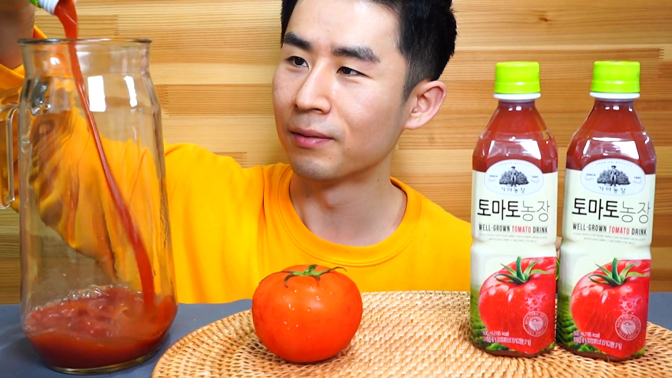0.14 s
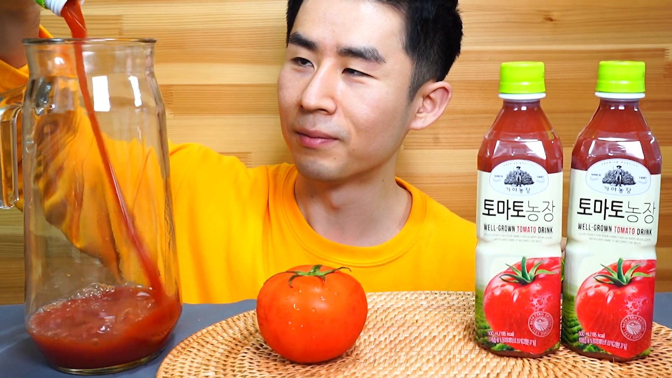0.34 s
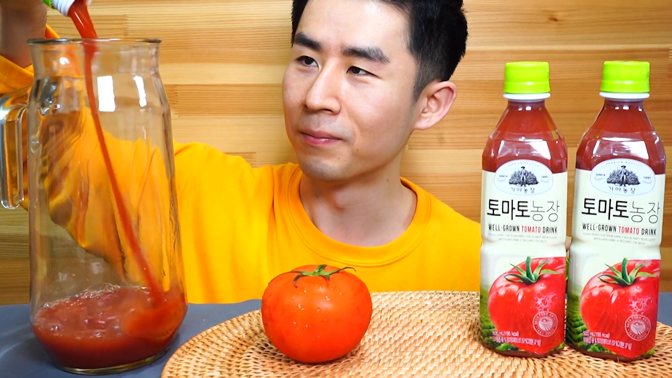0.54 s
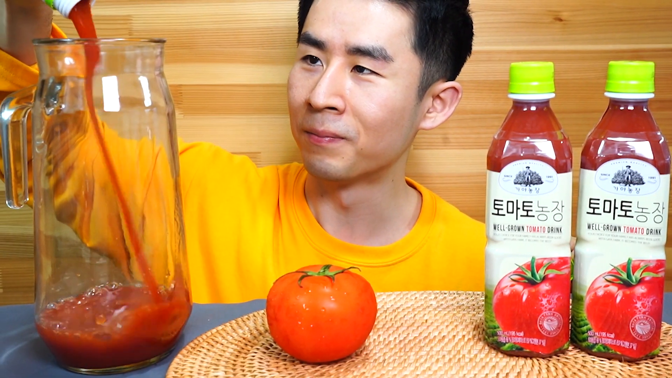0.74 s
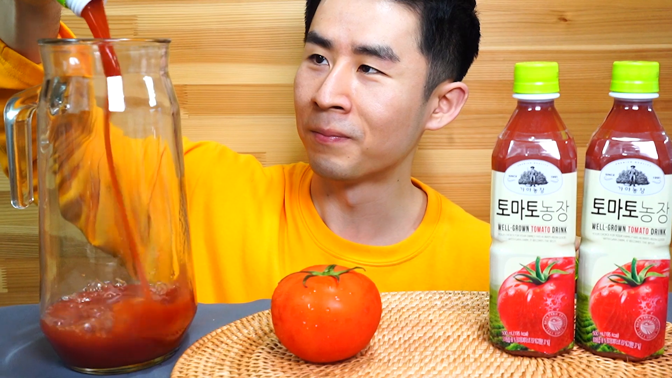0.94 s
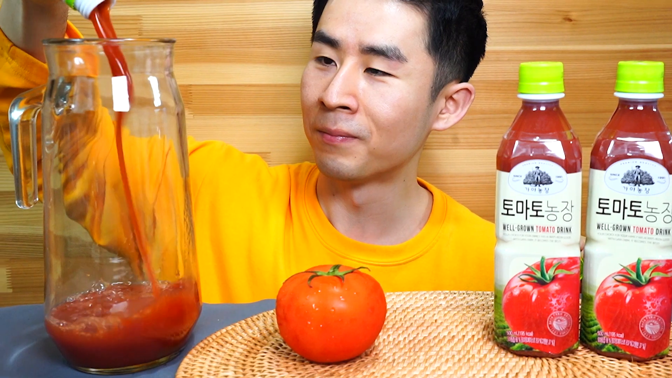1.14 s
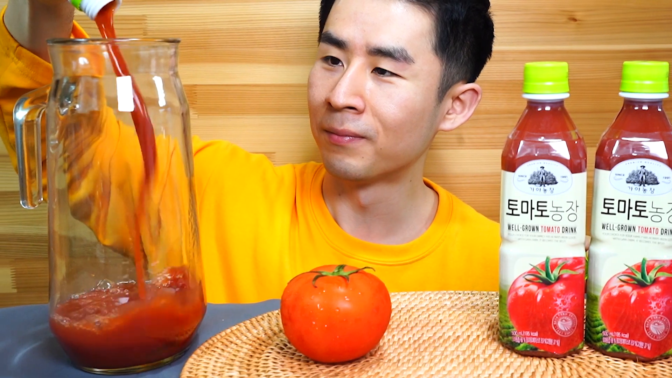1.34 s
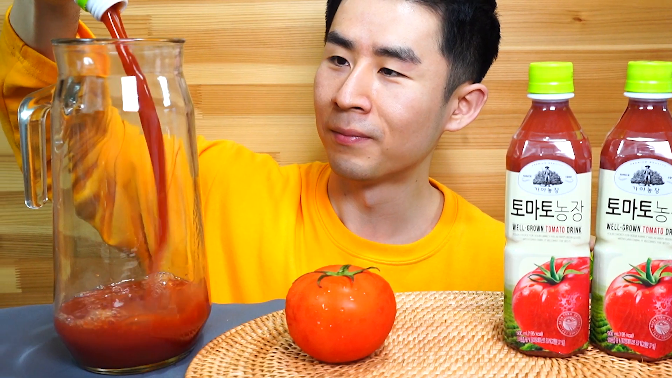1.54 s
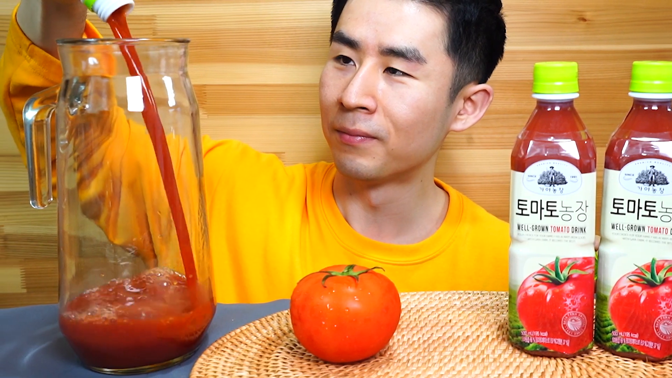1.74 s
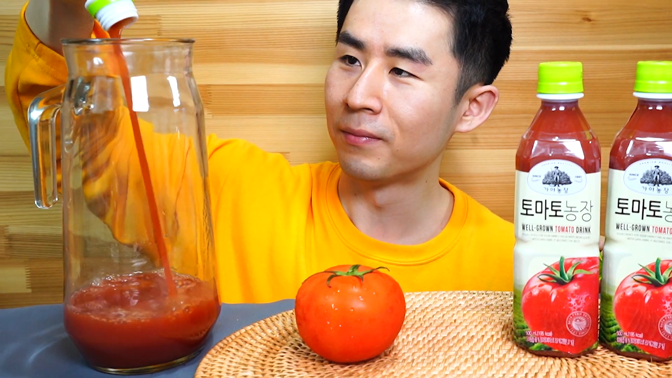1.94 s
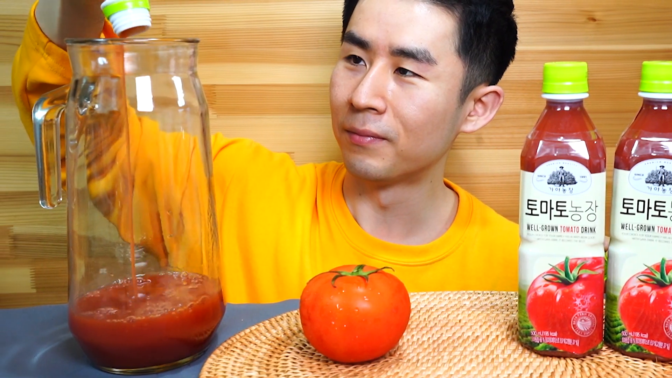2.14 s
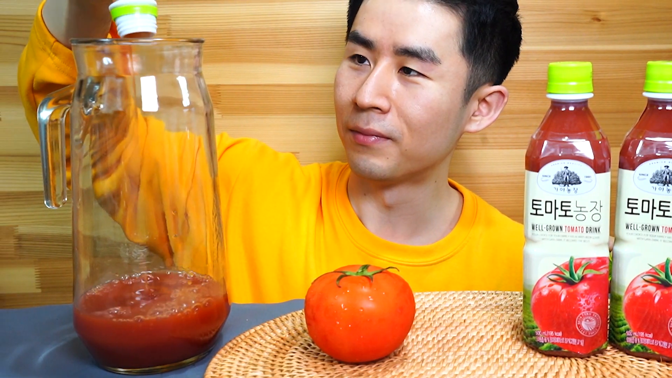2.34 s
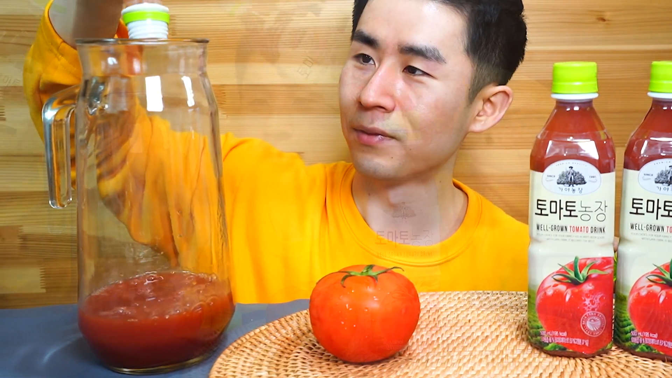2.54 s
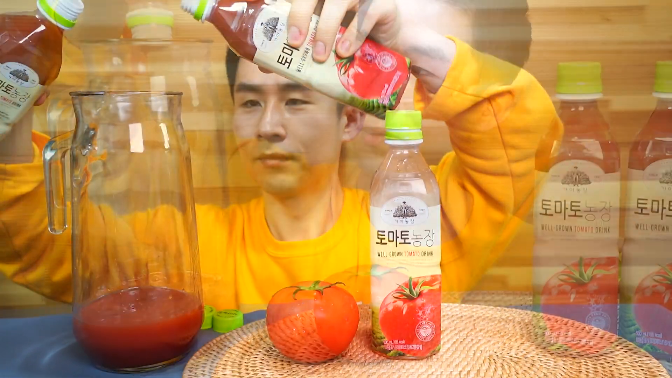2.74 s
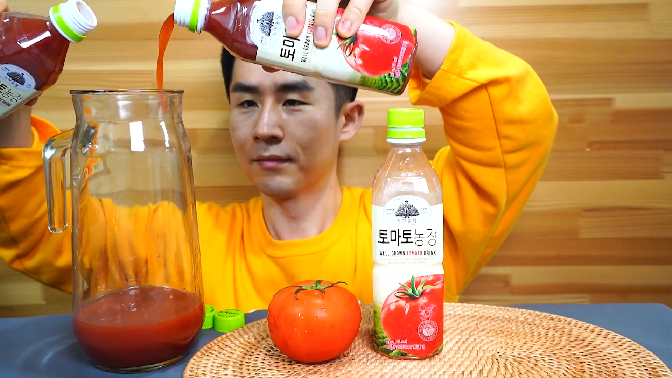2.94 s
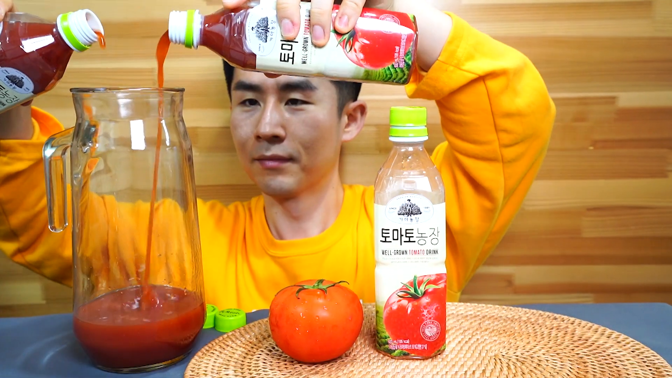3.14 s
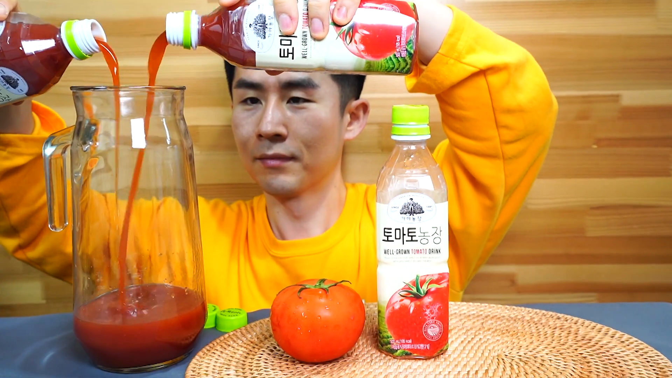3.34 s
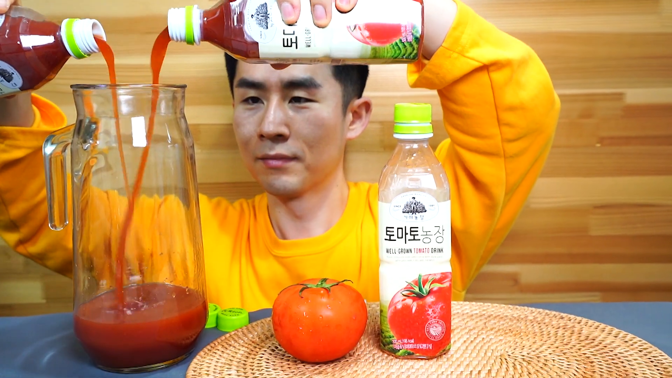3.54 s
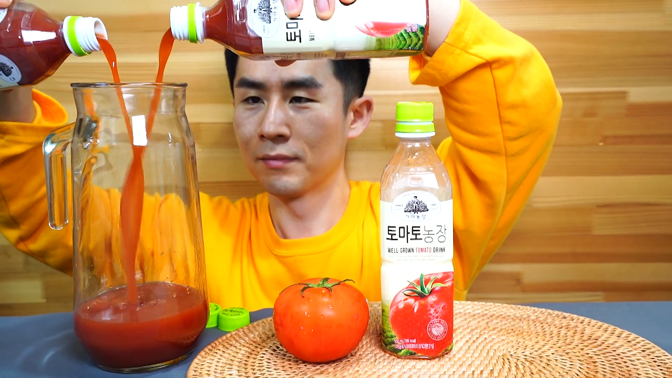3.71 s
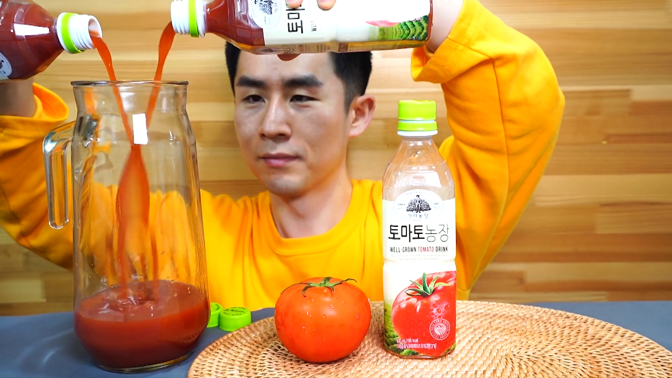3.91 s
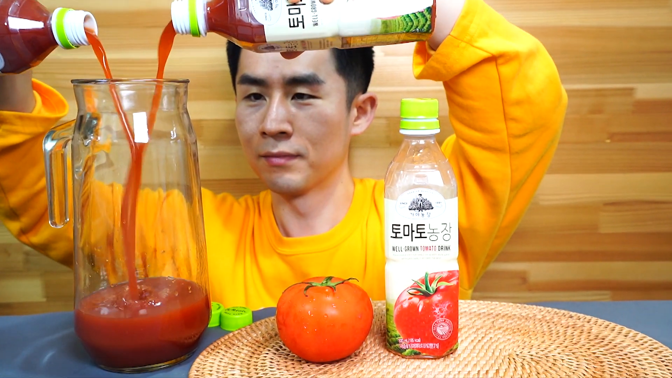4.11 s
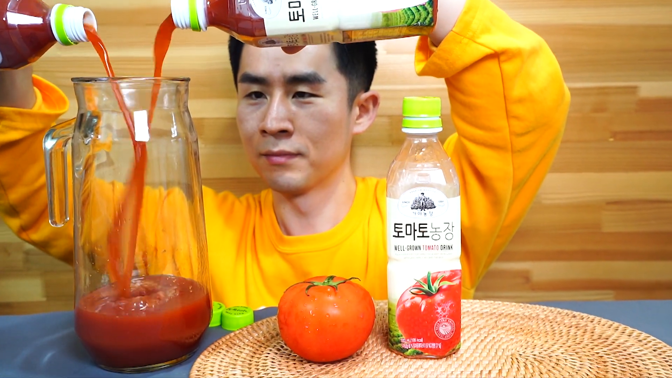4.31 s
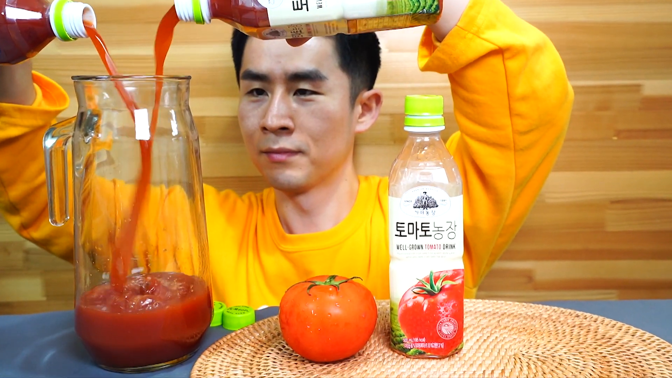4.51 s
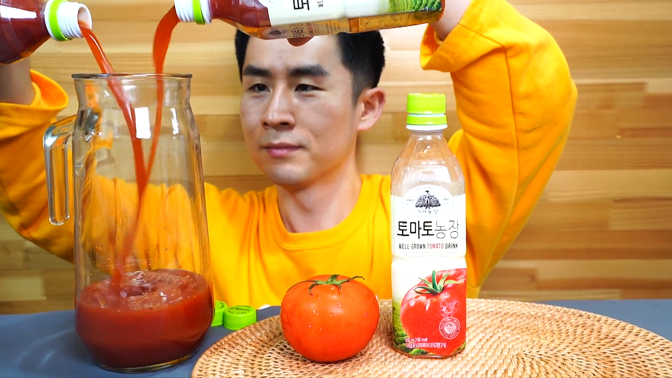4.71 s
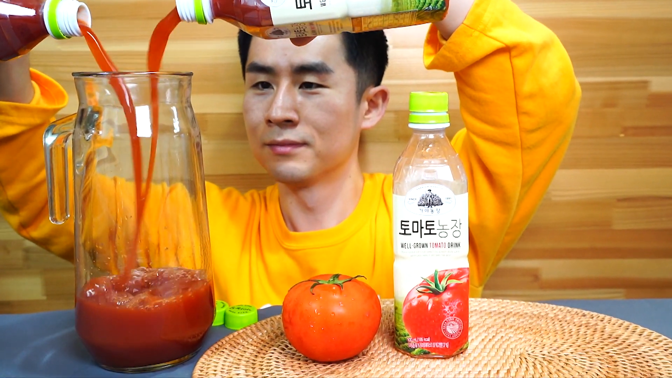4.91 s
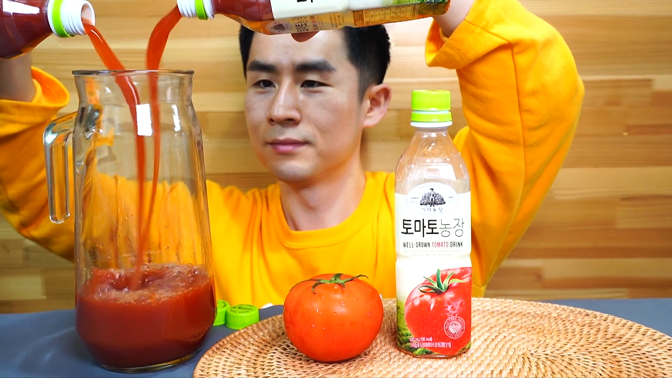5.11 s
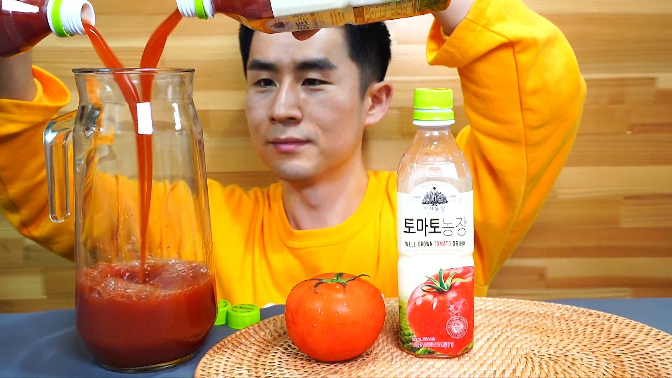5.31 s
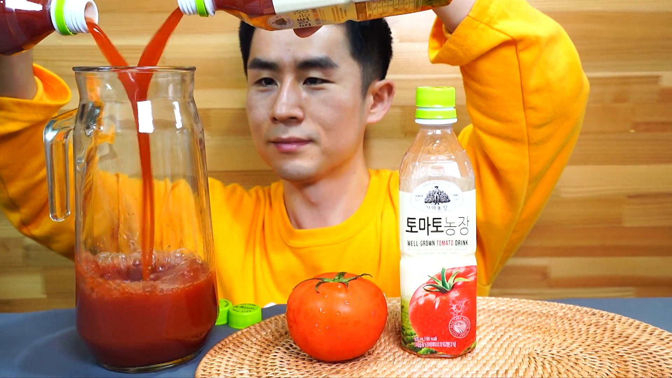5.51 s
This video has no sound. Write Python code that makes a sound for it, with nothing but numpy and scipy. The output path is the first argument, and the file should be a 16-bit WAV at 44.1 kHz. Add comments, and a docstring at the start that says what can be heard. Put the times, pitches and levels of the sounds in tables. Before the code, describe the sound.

Thick juice is poured close to the microphones into a tall glass pitcher, slightly left of centre, in a small quiet room. From 0 to about 2 s one stream churns unevenly: hollow low plops, glugs that sweep quickly upward, mid-pitched bloops, fine fizz and bright spatter ringing between the glass walls. A very strong gulp lands near 1.15 s, with more glugs and splashes around 1.5 to 1.9 s. The stream then thins to a dribble, with a small bloop at 2.4 s. In the near-quiet pause, soft dull knocks of handling come at about 2.7 and 2.85 s. Pouring returns at 3.3 s, and two streams soon run together; from 4.2 s plops crowd closer, heavy and wet, with steadier churning and fizz. The hollow air tone is mostly higher as the pitcher fills. The sound ends mid-pour at about 5.5 s, over faint room tone.

```python
"""Thick juice is poured from plastic bottles into a tall glass pitcher in a small room.
First one stream churns, glugs and fizzes; it thins out to a dribble.
In the pause come soft knocks of handling, then two streams pour together until the end.
Air trapped by the juice rings as plops, glugs and bubbles; bursts of spatter ring between the glass walls.
The ringing of the air above the juice mostly climbs in pitch as the pitcher fills."""
import sys
import numpy as np
from scipy import signal
from scipy.fft import rfft, irfft, next_fast_len
from scipy.io import wavfile

SR = 44100
rng = np.random.default_rng(int(sys.argv[2]) if len(sys.argv) > 2 else 0)


def store_pcm(level_fs):
    """Save levels as 16-bit WAV."""
    pcm = np.round(np.clip(level_fs, -1, 1) * 32767).astype(np.int16)
    wavfile.write(sys.argv[1], SR, np.atleast_2d(pcm).T)


N = 245195
TIME = np.arange(N) / SR   # seconds
CUTOFF_HZ = 15950   # top of the treble


def from_db(db):
    """Turn decibels into a gain."""
    return 10 ** (np.asarray(db) / 20)


def rms_one(x):
    """Scale a sound to an average (rms) strength of one."""
    return x / np.sqrt(np.mean(x ** 2) + 1e-20)


def in_time(rows):
    """Read each column of a table at every sample; the first column is time in seconds."""
    s, *columns = np.transpose(rows)
    return [np.interp(TIME, s, column) for column in columns]


def at_hz(points, hz):
    """Read a curve over pitch, with straight lines on a log-frequency axis."""
    f, value = np.transpose(points)
    return np.interp(np.log(np.maximum(hz, 1)), np.log(f), value)


def add(track, s, sound):
    """Mix a sound into the track at a given second."""
    start = max(0, round(s * SR))
    track[start:start + len(sound)] += sound[:max(0, N - start)]


def colour(x, spectrum, size=8192):
    """Filter a sound to a given spectrum, with nothing sounding ahead of time (minimum phase)."""
    gains = from_db(at_hz(spectrum, np.fft.rfftfreq(size, 1 / SR)))
    cepstrum = irfft(np.log(gains))
    # folding the second half onto the first makes the filter causal
    cepstrum[1:size // 2] *= 2
    cepstrum[size // 2 + 1:] = 0
    response = irfft(np.exp(rfft(cepstrum)))
    return signal.fftconvolve(x, response)[:len(x)]


def drift(rate):
    """Slow random wandering with a spread of about one, turning up to `rate` times a second."""
    knots = rng.standard_normal(int(rate * N / SR) + 2)
    return rms_one(np.interp(TIME * rate, np.arange(len(knots)), knots))


def tremble(t, rate):
    """Random unsteadiness over the life of one short sound, with a spread near one."""
    knots = rng.standard_normal(256)
    return np.interp(t * rate, np.arange(len(knots)), knots)


def resonance(x, hz, width_hz):
    """A ringing filter with a gain of one at its centre, which may move."""
    turn = np.exp(2j * np.pi * np.cumsum(hz * np.ones(len(x))) / SR)
    r = np.exp(-np.pi * width_hz / SR)
    # shift the centre down to zero, smooth, and shift back up
    smooth = signal.lfilter([1 - r], [1, -r], x / turn + 1e-18)
    return 2 * np.real(turn * smooth)


def swell_and_die(t, t60, swell_s):
    """Loudness of a bubble: a quick swell, then a fall of 60 dB every t60 seconds."""
    return (1 - np.exp(-(t / swell_s) ** 2)) * from_db(-60 * t / t60)


def bubble(t, hz, t60, rise, swell_s):
    """Air pulsing in juice: a dying sine whose envelope peaks at one, rising by `rise` octaves a second."""
    t = np.maximum(t, 0)
    envelope = swell_and_die(t, t60, swell_s)
    cycles = hz * t * (1 + rise * np.log(2) * t / 2)
    return np.sin(2 * np.pi * cycles) * envelope / (envelope.max(axis=-1, keepdims=True) + 1e-12)


def impacts(per_s, spread_db):
    """Random clicks of uneven size, as many small blows of juice would give."""
    sizes = from_db(spread_db * np.minimum(rng.exponential(1, N), 4)) * rng.choice([-1, 1], N)
    return sizes * (rng.random(N) < per_s / SR)


def tail(t60, gap_s):
    """Random echoes of unit energy that begin after a short gap and die away."""
    t = TIME[:SR * 3 // 4]
    echoes = rng.standard_normal(len(t)) * from_db(-60 * t / t60) * (t > gap_s)
    return echoes / np.sqrt(np.sum(echoes ** 2))


# colour of the quiet room: pitch_hz, level_db
QUIET_ROOM_COLOUR = [(15, -55), (25, -1), (127, 6.5), (394, -5), (463, -2.5), (624, -6), (818, -7),
                     (2350, -12), (3520, -14.5), (5140, -15), (6210, -18), (10100, -19.5), (12900, -21),
                     (16000, -23)]


def room_tone(level_db=-55, apart=0.87):
    """Faint steady rumble and hiss: coloured noise, partly different on the left and the right."""
    mid, side = [rms_one(colour(rng.standard_normal(N), QUIET_ROOM_COLOUR)) for part in range(2)]
    return from_db(level_db) * (mid + apart * side * np.array([[1], [-1]]))


# how strongly each stream runs, before surges and mixing: start_s, churn_db (deep), gurgle_db, fizz_db
FIRST_POUR = [(0.0, -52.5, -58, -35), (0.37, -47.5, -49, -39), (1.04, -51.5, -42.5, -39),
              (1.14, -40, -45.5, -41.5), (1.63, -54, -38.5, -35), (1.79, -47, -43.5, -40.5),
              (1.98, -55.5, -52.5, -58.5), (2.15, -57, -60.5, -53.5), (2.3, -62, -73, -75)]
DRIBBLE = [(2.4, -48, -45, -66), (2.558, -60.5, -58, -60), (2.68, -60, -47.5, -55.5)]
DOUBLE_POUR = [(3.33, -49, -57, -42), (3.45, -51.5, -46, -60), (3.58, -49, -50, -51.5),
               (4.03, -46, -50, -48), (4.2, -39.5, -44.5, -48.5), (4.76, -42.5, -45, -39.5),
               (5.09, -37.5, -44, -38.5), (5.2, -38, -44.5, -41.5), (5.56, -43, -48.5, -39)]
# gouts let go by the bottles, levels before mixing (t60: seconds to fall by 60 dB):
# start_s, plop_db, plop_t60_s, thud_db, glug_db, glug_pitch_hz
GOUTS = [(0.035, -49, .13, -50, -44, 495), (0.223, -25, 0.16, -37, -36, 386),
         (0.398, -32, 0.21, -44, -29.5, 654), (0.578, -26.5, 0.31, -41, -41.5, 464),
         (0.766, -29, 0.26, -39, -38, 478), (0.957, -24.5, 0.33, -42, -24, 431),
         (1.149, -8, .22, -21, -13, 364.5), (1.318, -21.5, 0.24, -45, -29, 375),
         (1.526, -30, 0.22, -23.5, -43, 482), (1.67, -13.5, 0.29, -22.5, -16, 384.6),
         (1.82, -17, 0.16, -37, -42, 360), (1.891, -21.5, 0.18, -53, -30.5, 356),
         (2.46, -56, .2, -50, -42, 773), (2.555, -58, .2, -58, -48.5, 872),
         (3.273, -27, 0.45, -21, -22, 513), (3.562, -32, .08, -48, -36.5, 613),
         (3.59, -41, 0.13, -33, -32.5, 502.5), (3.752, -30, .1, -43, -36, 482),
         (3.806, -26.5, 0.15, -42, -41, 484), (3.993, -26, 0.29, -21.5, -20.5, 522.5),
         (4.174, -5, 0.13, -20, -19, 434), (4.258, -27, 0.43, -44, -35, 427),
         (4.399, -26, 0.13, -21.5, -24, 467), (4.521, -20, 0.12, -43, -29, 416),
         (4.615, -8.5, 0.11, -17, -48, 410), (4.678, -18, .1, -39, -35, 435),
         (4.733, -17.5, 0.11, -29, -36, 424), (4.809, -18, 0.16, -21.5, -44, 431),
         (4.899, -19, 0.044, -52, -43, 428), (4.997, -15.5, 0.031, -24.5, -32, 442),
         (5.097, -14, 0.22, -31, -29, 394), (5.135, -16.5, 0.31, -33, -39, 436),
         (5.286, -8, 0.16, -16.5, -44, 440), (5.378, -16, 0.045, -51, -29, 439),
         (5.422, -18, .065, -40, -42, 450), (5.49, -6.5, 0.12, -18, -35, 434)]
# swelling of the stream around each gout: churn_db, gurgle_db, fizz_db
SURGE = (9.5, 5, 6)
START_DB_PER_S, STOP_DB_PER_S = 596, 305   # how fast a stream sets in and dies away
SURGE_LAG_S, SURGE_WIDTH_S = .02, .018


def flow():
    """Strength of the pour in dB: each stream sets in, runs, surges around every gout and dies away."""
    levels = []
    for pour in (FIRST_POUR, DRIBBLE, DOUBLE_POUR):
        early = np.maximum(pour[0][0] - TIME, 0)
        late = np.maximum(TIME - pour[-1][0], 0)
        levels.append(np.array(in_time(pour)) - START_DB_PER_S * early - STOP_DB_PER_S * late)
    surges = [1 / (1 + ((TIME - s - SURGE_LAG_S) / SURGE_WIDTH_S) ** 2) for s, *_ in GOUTS]
    return np.max(levels, axis=0) + np.outer(SURGE, np.max(surges, axis=0))


# colour of the fizz: pitch_hz, level_db
FIZZ_COLOUR = [(700, -23.5), (1500, -3.5), (2000, 3), (3200, 2), (4500, -1.5), (6000, 0.5), (9000, -8),
               (12000, -17.5), (16000, -22)]


def fizz(cycles=75, glide=16, spread_db=4.5, hiss=0.68, count=4000):
    """Small bubbles born at random ring for some dozens of cycles and chirp up as they near the surface."""
    t = TIME[:SR // 50]
    place, pitch, climb, size = rng.random((4, count, 1))
    hz = 1350 * 11 ** pitch
    sizes = from_db(-spread_db * np.log(np.maximum(size, .03)))
    fade = 1 - (t / t[-1]) ** 4
    rings = sizes * np.sqrt(hz) * bubble(t, hz, cycles / hz, glide * climb, swell_s=0.00027) * fade
    samples = (place * N).astype(int) + np.arange(len(t))
    bubbles = rms_one(np.bincount(samples.ravel(), rings.ravel(), minlength=N)[:N])
    return rms_one(colour(bubbles + hiss * rng.standard_normal(N), FIZZ_COLOUR))


# ringing pitches of the air above the juice: start_s, first_pitch_hz, second_pitch_hz
AIR_COLUMN = [(0, 317, 1120), (1.0, 316.7, 1130), (2.0, 325, 1165), (3.3, 325.7, 1204), (4.0, 346.5, 1154),
              (4.3, 356, 1195), (5.56, 364.5, 1257)]
# colour of the deep churning: pitch_hz, level_db
CHURN_COLOUR = [(25, -28), (42, -17), (58, 0.5), (90, 2.5), (130, -2.5), (220, 7), (300, 0.5), (500, -4),
                (650, -6), (900, -9), (1500, -30)]
SLOSH_OCTAVES, SLOSH_PER_S = 0.057, 29   # the heaving surface makes the stirred air waver


def stream(flow_db, column_db=-2.0, churn_db=-6.0, gurgle_db=0.5, fizz_db=-3.0):
    """Falling juice stirs the air column and beats in bubbles; returns the low and the fizzing part."""
    first_hz, second_hz = in_time(AIR_COLUMN)
    deep, gurgling, fizzing = from_db(flow_db)
    wavering_hz = first_hz * 2 ** (SLOSH_OCTAVES * drift(SLOSH_PER_S))
    column = rms_one(resonance(resonance(impacts(300, 1.0), wavering_hz, 22), first_hz, 150))
    churn = rms_one(colour(impacts(700, 2.7), CHURN_COLOUR))
    gurgle_hz = second_hz * 2 ** (0.11 * drift(15))
    gurgle = rms_one(resonance(resonance(impacts(170, 1.85), gurgle_hz, 67), second_hz, 600))
    low = deep * (from_db(column_db) * column + from_db(churn_db) * churn)
    low = low + gurgling * from_db(gurgle_db) * gurgle
    flicker = from_db(3.5 * drift(35))
    return low, fizzing * from_db(fizz_db) * flicker * fizz()


def glug(t, hz, t60, rise, swell_s=0.0011):
    """A large bubble deforms as it climbs, so its rising pitch wavers and its sound breaks up."""
    pitch = hz * 2 ** np.minimum(rise * t, 2) * (1 + .06 * tremble(t, 260))
    envelope = swell_and_die(t, t60, swell_s)
    breakup = 1 + .5 * tremble(t, 220)
    return np.sin(2 * np.pi * np.cumsum(pitch) / SR) * envelope / envelope.max() * breakup


# t60 of a faint glug; one at BIG_GLUG_DB dies away in half the time
GLUG_T60_S, BIG_GLUG_DB = 0.29, -19.5
# glugs glide up while the pool is shallow; the glide is halved at GLIDE_ENDS_S
GLIDE_OCTAVES_PER_S, GLIDE_ENDS_S, GLIDE_FADE_S = 18, 1.9, 0.57
PLOP_SAG_OCTAVES_PER_S = 0.39   # a plop sags in pitch as it rings
PLOP_SWELL_S, GLUG_LEAD_S = .003, .0015   # the bubble pinches off just before the air column rings


def plops(plop_db=-1.0, glug_db=0.5, twin_db=-8.0, twin_ratio=0.86, twin_delay_s=0.01191):
    """Each gout opens a hole that rings the air column as it closes, and leaves a large glugging bubble."""
    out, t = np.zeros(N), TIME[:SR // 3]
    times, first_hz, _ = np.transpose(AIR_COLUMN)
    for s, ring_db, ring_t60, _, bubble_db, bubble_hz in GOUTS:
        hz = np.interp(s, times, first_hz)
        plop = bubble(t, hz, ring_t60, -PLOP_SAG_OCTAVES_PER_S, PLOP_SWELL_S)
        add(out, s, from_db(ring_db + plop_db) * plop)
        rise = GLIDE_OCTAVES_PER_S / (1 + np.exp((s - GLIDE_ENDS_S) / GLIDE_FADE_S))
        t60 = GLUG_T60_S / (1 + from_db(bubble_db - BIG_GLUG_DB))
        add(out, s - GLUG_LEAD_S, from_db(bubble_db + glug_db) * glug(t, bubble_hz, t60, rise))
        # a second, weaker bubble splits off a moment later
        twin = glug(t, twin_ratio * bubble_hz, 0.5 * t60, rise)
        add(out, s + twin_delay_s, from_db(bubble_db + twin_db) * twin)
    return out


# colour of a thud: pitch_hz, level_db
THUD_COLOUR = [(25, -19.5), (42, -12.5), (70, -4.5), (120, -1), (230, 5.5), (400, -4), (700, -7),
               (1500, -7.5), (4000, -28), (12000, -57)]
# soft knocks of handling, levels before mixing: start_s, level_db, treble_edge_hz
KNOCKS = [(2.717, -36.5, 4000), (2.858, -32, 3950), (3.211, -41, 300)]
THUD_EDGE_HZ, CUSHION_DB_PER_OCTAVE = 1600, 7   # the more air a gout traps, the duller its thud


def thuds(thud_db=-0.5, shudder=0.88, shudder_s=0.014):
    """A soft blow from a gout or a knock, followed by a brief shudder of the pitcher and table."""
    out, t = np.zeros(N), TIME[:SR // 4]
    landings = []
    for s, ring_db, _, db, *_ in GOUTS:
        landings.append((s, db, THUD_EDGE_HZ * 2 ** ((db - ring_db) / CUSHION_DB_PER_OCTAVE)))
    for s, db, edge_hz in landings + list(KNOCKS):
        push = np.exp(-t / 0.00045) + shudder * rng.standard_normal(len(t)) * np.exp(-t / shudder_s)
        dulling = signal.butter(1, min(edge_hz, CUTOFF_HZ), fs=SR, output="sos")
        thud = signal.sosfilt(dulling, colour(push, THUD_COLOUR))
        add(out, s, from_db(db + thud_db) * thud / np.abs(thud).max())
    return out


# loudest bursts of spatter, before mixing: start_s, level_db, pitch_hz, spray_db (against level_db)
SPLASHES = [(0.0473, -26, 2870, -9), (0.1325, -19, 3495, -18.5), (0.2225, -31, 1730, -17),
            (0.3015, -36, 1780, -19), (0.413, -22, 1656, -30), (0.4708, -24, 4250, -15),
            (0.5086, -13.5, 2230, -27.5), (0.5651, -16.5, 2450, -33), (0.7472, -16, 3430, -19),
            (0.9442, -12.5, 3365, -20.5), (1.037, -19.5, 1826, -47), (1.073, -17, 3430, -24),
            (1.1232, -21, 8700, -14), (1.2126, -18.5, 6430, -27), (1.3068, -14.5, 3905, -21.5),
            (1.4363, -14, 2030, -22.5), (1.5001, -17, 3310, -20), (1.5255, -8, 2730, -24),
            (1.6574, -17.5, 3910, -17), (1.7693, -24, 2750, -10.5), (2.0226, -32, 1930, -21),
            (2.1704, -35, 1774, -26), (2.371, -32.5, 2024, -25), (2.4127, -31, 1774, -6),
            (2.6203, -31, 10050, -11), (3.2748, -17, 4020, -18), (3.3364, -31, 1954, -6.5),
            (3.3705, -32.5, 5020, -12.5), (3.5172, -29, 2090, -19), (3.5458, -28.5, 2150, -7.5),
            (3.7323, -16.5, 5690, -28), (3.9439, -34, 5600, -16), (4.1095, -21.5, 3210, -14),
            (4.157, -19.5, 1815, -19.5), (4.193, -23, 5450, -14), (4.354, -18.5, 3185, -20.5),
            (4.3963, -24.5, 6980, -5.5), (4.5774, -26, 2360, -3), (4.6145, -22.5, 5430, -3.5),
            (4.8664, -20.5, 1985, -23), (5.0584, -21, 2680, -21), (5.1133, -20, 2230, -31),
            (5.2858, -15, 3710, -18), (5.4892, -12.5, 3270, -18)]
# average colour of the spray: pitch_hz, level_db
SPRAY_COLOUR = [(500, 7), (1500, -11), (3200, -1.5), (6000, 5), (9000, 7), (11000, 0.5), (13000, -13.5),
                (16000, -20)]
SPLASH_S, SPLASH_OCTAVES = .013, 0.4407   # time scale of a burst; pitch scatter of its bubbles


def splashes(bursts, main_db=-10.5, cluster_db=-6.0, spray_db=0.0, patchy_db=2.5, crack_db=2.5,
             soft_swell_s=0.0069, cycles=70, glide=9, count=22):
    """Each burst is one main bubble, a cluster of small ones around its pitch and a crackle of spray."""
    ringing, spray, t = np.zeros(N), np.zeros(N), TIME[:SR // 11]
    for s, db, hz, bright_db in bursts:
        scatter = 2 ** (SPLASH_OCTAVES * rng.standard_normal((count, 1)))
        pitches = np.clip(hz * scatter, 1350, 12000)
        delays = rng.exponential(SPLASH_S, (count, 1))
        # late bubbles and the highest-pitched, smallest ones are weak
        sizes = from_db(rng.normal(0, 2.44, (count, 1))) * np.exp(-delays / SPLASH_S / 2)
        sizes = sizes / (1 + (pitches / 7500) ** 4)
        rises = glide * rng.random((count, 1))
        rings = bubble(t - delays, pitches, cycles / pitches, rises, swell_s=0.00052)
        cluster = np.sum(sizes * rings, axis=0)
        cluster = cluster / np.abs(cluster).max()
        main = bubble(t, hz, t60=4 * SPLASH_S, rise=2.3, swell_s=0.0014)
        add(ringing, s, from_db(db) * (from_db(main_db) * main + from_db(cluster_db) * cluster))
        # a hard splash starts with a crack, a gentle one swells; then droplets patter down
        hardness = np.clip((db + bright_db + 42.0) / 10, 0, 1)
        swell = 1 - (1 - hardness) * np.exp(-t / soft_swell_s)
        patter = swell * from_db(1.0 * tremble(t, 680)) * np.exp(-t / SPLASH_S)
        crack = hardness * from_db(crack_db) * np.exp(-t / 0.00052)
        droplets = (patter + crack) * rng.standard_normal(len(t))
        # every burst throws droplets of its own sizes
        tint = [(f, level + patchy_db * rng.standard_normal()) for f, level in SPRAY_COLOUR]
        add(spray, s, from_db(db + bright_db + spray_db) * colour(droplets, tint, size=1024))
    return ringing + spray


SPATTER_PER_S, SECOND_STREAM_S = 20, 3.7   # average rate for one stream; from here two throw twice as much
SPATTER_DB, SPATTER_SPREAD_DB = 9, 1   # level against the fizzing strength of the stream
SPATTER_SPRAY_DB = -18.5   # spray against the level of the burst
SPATTER_HZ, SPATTER_OCTAVES_PER_S = 2300, .09   # middle pitch at the start, and its climb


def spatter(fizzing_db, count=320):
    """Lesser bursts at random moments, stronger with the stream and higher as the pitcher fills."""
    place, chance = rng.random((2, count))
    size, pitch = np.clip(rng.standard_normal((2, count)), -2, 2)
    at = (place * N).astype(int)
    hz = SPATTER_HZ * 2 ** (SPATTER_OCTAVES_PER_S * TIME[at] + SPLASH_OCTAVES * pitch)
    db = fizzing_db[at] + SPATTER_DB + SPATTER_SPREAD_DB * size
    rows = np.transpose([TIME[at], db, hz, np.full(count, SPATTER_SPRAY_DB)])
    streams = 1 + (TIME[at] > SECOND_STREAM_S)
    return list(rows[chance < streams * SPATTER_PER_S * N / SR / count])


# ringing of the glass wall and of the air across the pitcher, before mixing: pitch_hz, width_hz, level_db
CROSS_MODES = [(1693, 1, 9), (1794, 4, 9), (1810, 7.3, -11), (1909, 20, 5), (2155, 38, -6.5),
               (2378, 13, -3.5), (2672, 15.6, 3.5), (2930, 24, 1.5), (3190, 67, -2.5), (3713, 34, -4),
               (3797, 14, 4), (4490, 28, -13.5), (4930, 49, 0), (5320, 53, -3.5), (5570, 30, 2),
               (6280, 26, -2)]


def pitcher(x, direct_db=-3.0, modes_db=2.0, flutter_db=-4.5):
    """Fizz and spatter bounce between the glass walls: sharp modes and a dense ring unlike left and right."""
    modes = sum(from_db(db) * resonance(x, hz, width) for hz, width, db in CROSS_MODES)
    flutter = [signal.fftconvolve(x, tail(t60=0.092, gap_s=0.0023))[:N] for channel in range(2)]
    return from_db(direct_db) * x + from_db(modes_db) * modes + from_db(flutter_db) * np.array(flutter)


# middle-sized bubbles and drips, levels before mixing: start_s, level_db, pitch_hz
BLOOPS = [(0.147, -30, 1100), (0.289, -34, 1325), (0.437, -25.5, 1107), (0.576, -23.5, 1154),
          (0.829, -23.5, 1080), (1.034, -19.5, 1159), (1.122, -16, 1150), (1.18, -20.5, 1131),
          (1.22, -26, 1142), (1.338, -27, 1136), (1.491, -27.5, 1340), (1.523, -17.5, 1200),
          (1.652, -13.5, 1127), (1.749, -26.5, 1157), (1.918, -30.5, 1155), (2.068, -32, 1203),
          (2.37, -38, 1127), (2.414, -19, 1136), (2.461, -42, 1100), (2.672, -34.5, 1166),
          (3.273, -22.5, 1168), (3.473, -32.5, 1203), (3.997, -26, 1196), (4.151, -26, 1306),
          (4.971, -24.5, 1308), (5.096, -25, 1272), (5.493, -26.5, 1292)]
# neighbouring rings of each bloop: pitch_ratio, level_db
BLOOP_PARTNERS = [(.93, -16), (1.13, -15)]
BLOOP_T60_S = 0.073


def bloops(bloop_db=-1.5, bloop_rise=0.9, blip_db=-11):
    """Middle-sized bubbles: a short upward blip with a ring of the air near its second resonance."""
    out, t = np.zeros(N), TIME[:SR // 3]
    partials = [(0.99, 0)] + list(BLOOP_PARTNERS)
    for s, db, hz in BLOOPS:
        blip = bubble(t, .97 * hz, t60=.055, rise=11, swell_s=.003)
        rings = sum(from_db(level) * bubble(t, ratio * hz, BLOOP_T60_S, bloop_rise, swell_s=0.0019)
                    for ratio, level in partials)
        add(out, s, from_db(db + bloop_db) * (rings / np.abs(rings).max() + from_db(blip_db) * blip))
    return out


# colour of the room echo: pitch_hz, level_db
ECHO_COLOUR = [(50, 15.5), (130, 0), (330, -16), (550, -2.5), (1150, -9), (2500, -7), (6000, -12),
               (14000, -0.5)]
# how much louder the left is than the right: pitch_hz, level_db
LEFT_LEAN = [(60, -3), (130, 1.5), (330, 2), (600, 4.5), (1200, 4.5), (2400, 3), (8000, 3), (15000, 1.5)]
# phase by which the left microphone leads: pitch_hz, phase_radians
LEFT_LEAD = [(1500, 0.5), (4000, 1.7), (6000, 0), (9000, 1.57), (12000, 0.5), (16000, -0.5)]
ROOM_T60_S = 0.3   # decay of the echoes, before their colouring


def room(x):
    """The pitcher stands near and to the left; each microphone hears its own echoes."""
    size = next_fast_len(N + SR)
    hz = np.fft.rfftfreq(size, 1 / SR)
    side = np.array([[.5], [-.5]])
    direct = np.exp(1j * side * at_hz(LEFT_LEAD, hz))
    echoes = rfft([colour(tail(ROOM_T60_S, gap_s=0.00395), ECHO_COLOUR) for channel in range(2)], size)
    balance = from_db(side * at_hz(LEFT_LEAN, hz))
    return irfft(rfft(x, size) * (direct + echoes) * balance, size)[:, :N]


def scene():
    """All the pouring sounds in the room."""
    flow_db = flow()
    low, fizzing = stream(flow_db)
    gouts = plops() + bloops() + thuds()
    bursts = list(SPLASHES) + spatter(flow_db[2])
    pour = low + gouts + pitcher(fizzing + splashes(bursts))
    return room(pour) + room_tone()


def record(dry, low_cut_hz=44):
    """The microphones lose the deepest bass; the top is cut steeply."""
    bass_cut = signal.butter(2, low_cut_hz, "high", fs=SR, output="sos")
    treble_cut = signal.ellip(12, .1, 80, CUTOFF_HZ, fs=SR, output="sos")
    return signal.sosfilt(treble_cut, signal.sosfilt(bass_cut, dry))


dry = scene()
out = record(dry)
store_pcm(out)
```